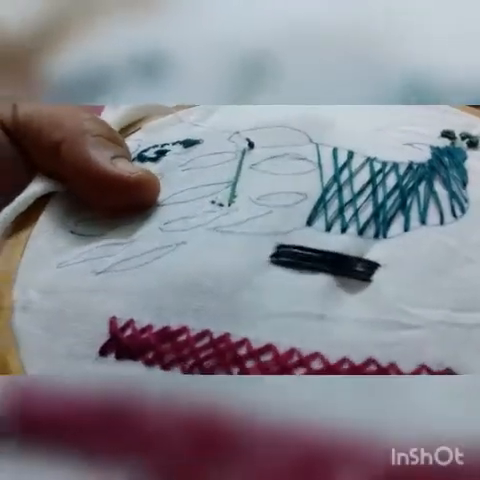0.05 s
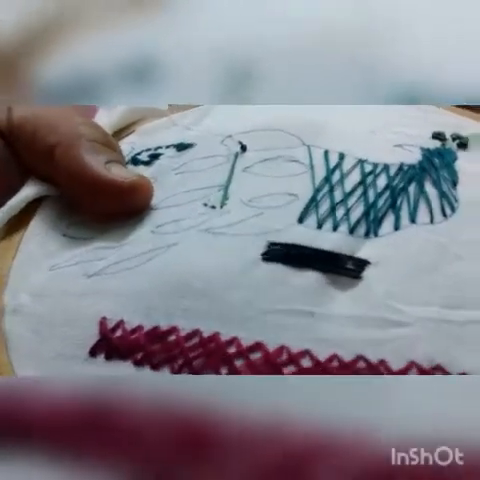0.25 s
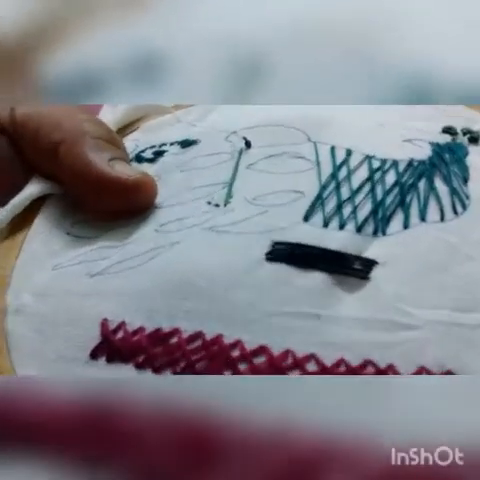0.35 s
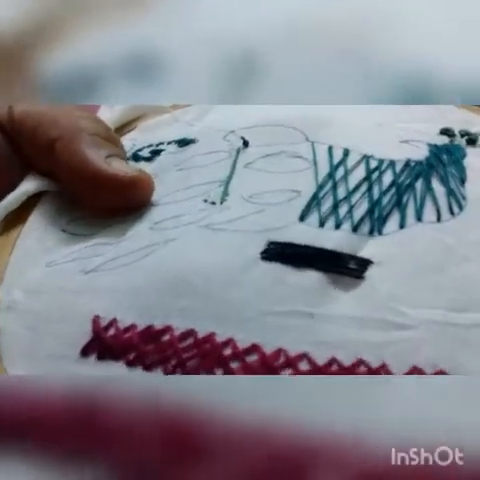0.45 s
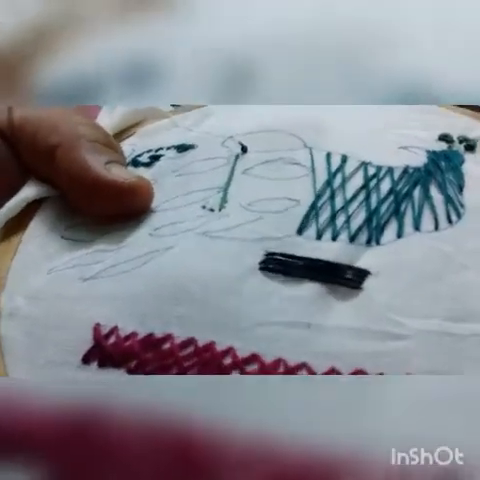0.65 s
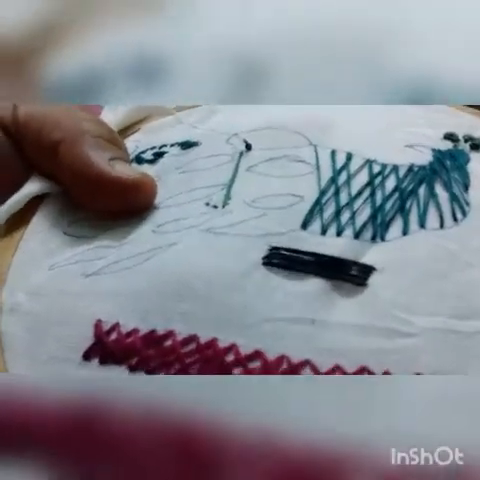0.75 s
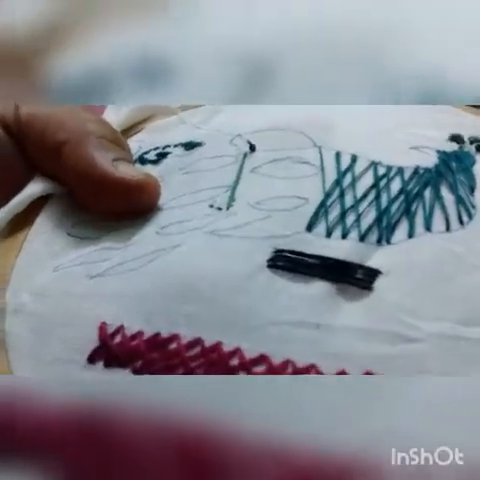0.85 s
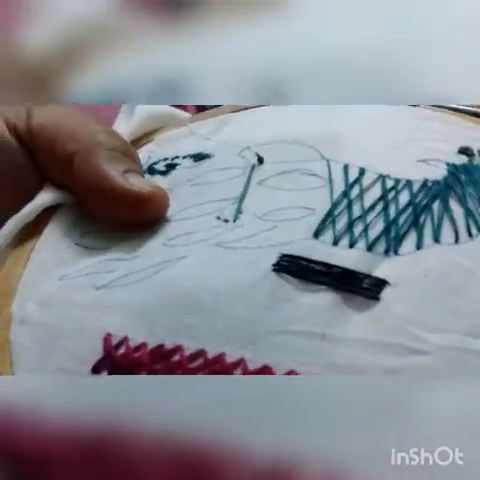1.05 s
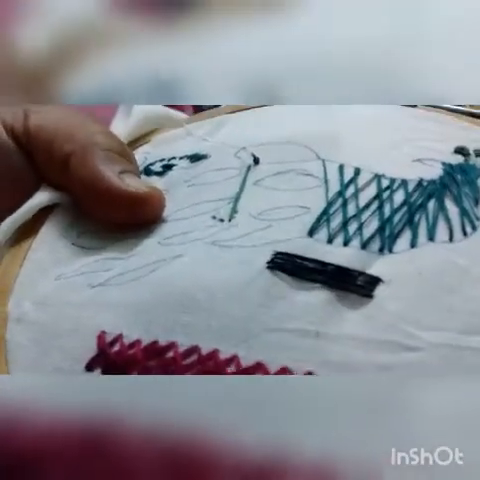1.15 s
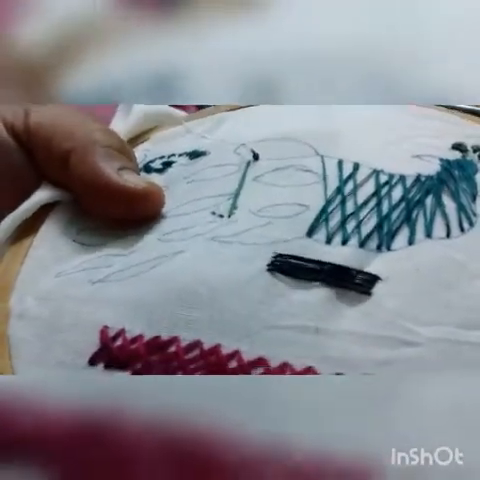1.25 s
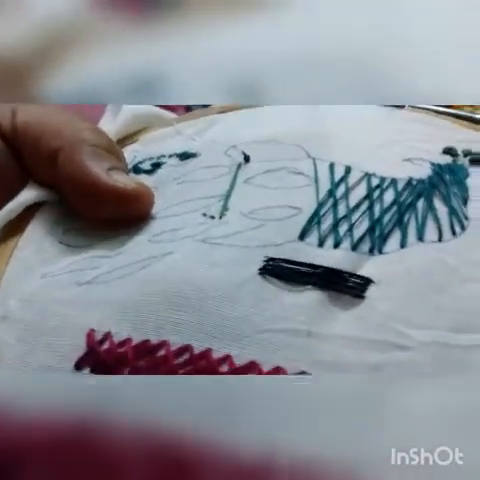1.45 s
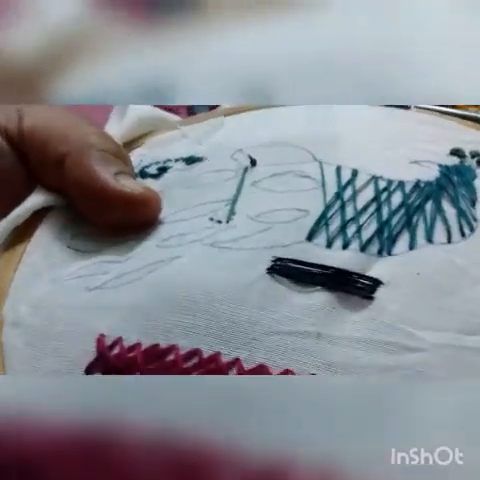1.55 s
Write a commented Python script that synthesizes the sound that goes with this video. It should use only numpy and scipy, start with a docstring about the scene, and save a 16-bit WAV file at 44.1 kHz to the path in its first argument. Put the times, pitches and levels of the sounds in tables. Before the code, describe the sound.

In a quiet room, a sharp, clicking knock hits close on the right. On the left, an embroidery hoop's taut cloth is tapped, then thread scratches and ticks through it, with faint hiss and appliance hum behind.

```python
"""A quiet room, an embroidery hoop held close to a phone's two microphone ports. Soft taps drum on the
stretched cloth by the left port, and thread scratches and ticks through the weave. One sharp knock,
just after a lighter contact, lands right at the right port. Behind are room rumble, hiss and the hum
and whine of an appliance. The phone widens its ports by cross-feed and clips on the knock; its gain
control then ducks the room and slowly lets it back."""
import sys
import numpy as np
from scipy import signal
from scipy.fft import rfft, irfft
from scipy.io import wavfile
from scipy.ndimage import uniform_filter1d

SR = 44100
rng = np.random.default_rng(int(sys.argv[2]) if len(sys.argv) > 2 else 0)


def dump(signal):
    """Clip the signal to [-1, 1] and save it as 16-bit WAV at the path in sys.argv[1]."""
    limited = np.clip(np.atleast_2d(signal).T, -1, 1)
    pcm = np.round(limited * 32767).astype(np.int16)
    wavfile.write(sys.argv[1], SR, pcm)


N = 70560

# Room noise common to both ports, and the part opposed between them. Each row: frequency in Hz, gain in dB.
ROOM_SHARED = [(25, -98.5), (60, -65.5), (110, -65), (180, -65.5), (290, -72), (420, -71), (620, -82.5),
               (950, -80.5), (1300, -89), (1900, -90.5), (2700, -95.5), (4500, -101), (6800, -101),
               (8000, -99), (9500, -101), (15000, -107)]
ROOM_APART = [(25, -85.5), (60, -94.5), (130, -74), (300, -84), (440, -83.5), (650, -89), (950, -88),
              (1300, -85.5), (2400, -89.5), (3200, -92), (4200, -99), (6500, -104), (8000, -93),
              (9500, -104), (15000, -107)]
# Lean of the room noise. Each row: frequency in Hz, left over right in dB.
ROOM_LEAN = [(60, 17), (200, 9.5), (400, 4.5), (1300, 2), (4400, 6), (8000, -3.5), (15000, 6.5)]
# Slow swell of the rumble. Each row: time in seconds, gain in dB.
RUMBLE_SWELL = [(0, 2.5), (.19, 5), (.235, -6), (.45, 0.5), (.65, 2.5), (.9, 3.5), (1.1, 0.5), (1.3, 2),
                (1.6, 8)]

# Mains hum of the appliance. Each row: frequency in Hz, level in dB before the swell.
MAINS_HUM = [(101, -54), (150, -53), (199.5, -56.5)]
# Its airy drone. Each row: frequency in Hz, width in Hz, level in dB, left over right in dB.
DRONE_BANDS = [(450, 14, -64, -8.5), (983, 32, -68, 3)]
# Its thin whine. Each row: frequency in Hz, width in Hz, level in dB before the swell.
WHINE_BANDS = [(1798, 20, -61), (2188, 43, -61)]
# Swell of the hum and whine. Each row: time in seconds, gain in dB.
APPLIANCE_SWELL = [(0, -1), (.18, -4.5), (.24, -5.5), (.5, -1.5), (1.0, -3), (1.5, 4), (1.6, 2)]

# Soft taps on the cloth. Each row: start in seconds, level in dB, boom gain in dB, snap gain in dB.
TAPS = [(.03, -31, 0.5, -35), (0.144, -26, -10, -19), (.595, -34, -16, 5.5), (0.7172, -10, -10, -4.5)]
# A tap's drum note and bright snap. Each row: frequency in Hz, relative level in dB, t60 in seconds.
DRUM_MODES = [(200, 1, .019), (680, -7, .007)]
SNAP_MODES = [(4240, -18, 0.0071), (5630, -21.5, 0.0057), (7500, -12.5, 0.0022), (9900, -2, 0.0013)]

# Scratches on the cloth. Each row: start in seconds, length in seconds, level in dB.
SCRATCHES = [(0.06, 0.3, -51.5), (0.895, 0.072, -46), (1.322, 0.067, -57)]
# Colour of a scratch. Each row: frequency in Hz, relative level in dB.
CLOTH_COLOUR = [(150, -0.5), (600, 8.5), (1200, 12.5), (2400, 6.5), (4500, 1.5), (9000, -40.5),
                (15000, -29.5)]

# Light contact, then hard knock. Each row: start in seconds, level in dB, thump gain in dB, cutoff in Hz.
KNOCKS = [(0.1946, -19.5, -11.5, 2470), (.21, 2, 0.5, 9500)]
# Bright ring of the held body. Each row: frequency in Hz, relative level in dB, t60 in seconds.
BODY_MODES = [(3110, -1, .0021), (4790, -2.5, 0.00099), (9750, -10, 0.0006)]
# Colour of a knock's echo. Each row: frequency in Hz, relative level in dB.
ECHO_COLOUR = [(100, -16), (300, -9), (700, 2.5), (2000, 2.5), (4500, 3), (9000, -10), (11500, -13.5),
               (15000, -36)]

# Thread catching in the weave. Each row: start in seconds, level in dB.
CATCHES = [(.9135, -33), (0.928, -30.5), (.9487, -32.5), (.954, -38), (0.9668, -26.5), (0.9713, -34)]
# Ring of a catch. Each row: frequency in Hz, relative level in dB, t60 in seconds.
CATCH_MODES = [(1670, 7.5, 0.0024), (4900, -21, 0.00081)]

# Cross-feed between the ports. Each row: frequency in Hz, gain in dB.
CROSS_FEED = [(100, -2), (1000, 0.78), (6400, -3.5), (8500, -1.5), (15000, -41)]
# The phone's own hiss. Each row: frequency in Hz, density in dB per Hz.
PHONE_HISS = [(2000, -124), (8000, -121), (11000, -118), (15000, -119)]

TIME = np.arange(N) / SR
FREQS = np.fft.rfftfreq(N, 1 / SR)
LEFT_PORT, OPPOSED = np.array([[1], [0]]), np.array([[1], [-1]])


def undb(db):
    """Decibels to gain."""
    return 10 ** (np.asarray(db) / 20)


def unit(x):
    """Scale to rms 1."""
    return x / np.sqrt(np.mean(x ** 2) + 1e-18)


def colour(x, points):
    """Filter by (Hz, dB) points joined on a log-frequency axis."""
    hz, db = np.array(points, float).T
    gain_db = np.interp(np.log(np.maximum(FREQS, 1)), np.log(hz), db)
    return irfft(rfft(x) * undb(gain_db), N)


def soften(x, hz):
    """Gentle low-pass: a softer contact."""
    return signal.sosfilt(signal.butter(2, hz, fs=SR, output="sos"), x)


def noise_band(hz, width_hz):
    """A wavering tone: noise in one steep resonance, rms 1."""
    resonance = 1 / (1 + ((FREQS - hz) / (width_hz / 2)) ** 2)
    return unit(irfft(rfft(rng.standard_normal(N)) * resonance, N))


def wander(per_s):
    """Smooth random wander, rms 1."""
    hold = int(SR / per_s)
    steps = np.repeat(rng.standard_normal(N // hold + 1), hold)
    return unit(uniform_filter1d(steps, hold)[:N])


def swell(points):
    """Gain over time from (s, dB) points."""
    return undb(np.interp(TIME, *np.array(points).T))


def mode(age, hz, db, t60):
    """One struck vibration, dying by 60 dB in t60 seconds."""
    return undb(db) * np.sin(2 * np.pi * hz * age) * np.exp(-np.log(1000) * age / t60)


def ring(age, modes):
    """Several modes struck together."""
    return sum(mode(age, *row) for row in modes)


def room(waver_db=3):
    """Wavering rumble, smooth hiss and the appliance's airy whistle, heard through the cross-feed."""
    shared, apart = rng.standard_normal((2, N)) * np.sqrt(SR / 2)
    bass = colour(shared, [(200, -4.0), (800, -22)])
    bass_gain = swell(RUMBLE_SWELL) * undb(waver_db * wander(per_s=14.48))
    shared = colour(shared + bass * (bass_gain - 1), ROOM_SHARED)
    whistle = undb(-71) * noise_band(hz=3180, width_hz=82)
    apart = colour(apart, ROOM_APART) + whistle
    left, right = widen(shared + OPPOSED * apart)
    return np.array([colour(left, [(hz, db / 2) for hz, db in ROOM_LEAN]),
                     colour(right, [(hz, -db / 2) for hz, db in ROOM_LEAN])])


def appliance(hum_waver_db=0.5, hum_left_db=1):
    """In the background: mains hum a little to the left, an airy drone and a thin, centred whine."""
    hum = np.zeros(N)
    for hz, db in MAINS_HUM:
        gain = undb(db + hum_waver_db * wander(per_s=3.3))
        hum += gain * unit(np.sin(2 * np.pi * (hz * TIME + rng.random())))
    hum = hum * undb(OPPOSED * hum_left_db / 2)
    drone = sum(undb(db + OPPOSED * left_db / 2) * noise_band(hz, width)
                for hz, width, db, left_db in DRONE_BANDS)
    tone_hz = 2196 + 5.2 * wander(per_s=10)
    tone = undb(-63) * unit(np.sin(2 * np.pi * np.cumsum(tone_hz) / SR))
    whine = tone + sum(undb(db) * noise_band(hz, width) for hz, width, db in WHINE_BANDS)
    return (hum + whine) * swell(APPLIANCE_SWELL) + drone


def taps(fizz_decay_s=0.0026):
    """Close to the left port, the stretched cloth answers like a small slack drum with a bright snap."""
    out = np.zeros(N)
    for start, db, boom_db, snap_db in TAPS:
        age = np.maximum(TIME - start, 0)
        boom = mode(age, hz=57.6, db=boom_db, t60=0.13)
        fizz = undb(-17) * (TIME >= start) * np.exp(-age / fizz_decay_s) * rng.standard_normal(N)
        snap = undb(snap_db) * soften(ring(age, SNAP_MODES) + fizz, hz=8060)
        out += undb(db) * (ring(age, DRUM_MODES) + boom + snap)
    return LEFT_PORT * out


def scratches(slips_per_s=1200, spread_db=2.5):
    """Close to the left port, cloth fibres catch and slip in short strokes."""
    slipping = rng.random(N) < slips_per_s / SR
    slips = slipping * rng.standard_normal(N) * undb(spread_db * rng.standard_normal(N))
    strokes = np.zeros(N)
    for start, length, db in SCRATCHES:
        progress = np.clip((TIME - start) / length, 0, 1)
        strokes += undb(db) * np.sqrt(np.abs(np.sin(np.pi * progress)))
    return LEFT_PORT * unit(colour(slips, CLOTH_COLOUR)) * strokes


def knocks(press_s=0.00066, crack_decay_s=0.0019, echo_t60_s=0.5, grain_db=0.5):
    """Each contact presses the body at the right port; it springs back and rings, with a faint echo."""
    out = np.zeros((2, N))
    for start, db, thump_db, cutoff_hz in KNOCKS:
        press = undb(0.5) * np.sin(np.pi * np.clip((TIME - start) / press_s, 0, 1) ** 2)
        released = TIME >= start + press_s
        age = np.maximum(TIME - start - press_s, 0)
        thump = undb(thump_db) * mode(age, hz=143, db=4.4, t60=0.0066)
        hollow = mode(age, hz=1380, db=-0.5, t60=0.0012)
        body = thump - hollow + ring(age, BODY_MODES)  # the hollow note swings against the thump
        crack = undb(-17.5) * released * np.exp(-age / crack_decay_s) * rng.standard_normal(N)
        out[1] += undb(db) * soften(press - body + crack, cutoff_hz)
        echo = unit(colour(rng.standard_normal((2, N)), ECHO_COLOUR))
        echo *= released * np.exp(-np.log(1000) * age / echo_t60_s)
        out += undb(db - 48.5 + grain_db * wander(per_s=700)) * echo
    return out


def thread():
    """Close to the left port, the thread catches and slips in a run of small dry ticks."""
    ticks = sum(undb(db) * ring(np.maximum(TIME - start, 0), CATCH_MODES) for start, db in CATCHES)
    return LEFT_PORT * ticks


def widen(ports, lag_s=0.000313):
    """Each channel is its own port minus the other, filtered and late by the way between them."""
    delay = np.exp(-2j * np.pi * FREQS * lag_s)
    other_port = irfft(rfft(ports[::-1]) * delay, N)
    return ports - colour(other_port, CROSS_FEED)


def scene():
    """The hoop close to the microphones, the room and the appliance behind."""
    return widen(knocks() + taps() + thread() + scratches()) + room() + appliance()


def gain_control(x, threshold_db=-16, recovery_db_per_s=9.5, late_s=0.048, slew_s=0.028):
    """The phone turns both channels down a moment after a loud peak, then creeps back up."""
    peak_db = 20 * np.log10(np.abs(x).max(axis=0) + 1e-9)
    over_db = np.maximum(peak_db - threshold_db, 0)
    recovery_db = recovery_db_per_s * TIME
    duck_db = np.maximum.accumulate(over_db + recovery_db) - recovery_db
    late_duck_db = np.pad(duck_db, (int(late_s * SR), 0))[:N]
    return x * undb(-uniform_filter1d(late_duck_db, int(slew_s * SR)))


def record(dry, clip_level=0.9, top_hz=15900):
    """In the phone, peaks clip and duck the gain; its faint hiss stays level, and the top is cut."""
    ducked = gain_control(np.clip(dry, -clip_level, clip_level))
    hiss = colour(rng.standard_normal((2, N)) * np.sqrt(SR / 2), PHONE_HISS)
    top_cut = signal.ellip(10, 0.1, 80, top_hz, fs=SR, output="sos")
    return signal.sosfilt(top_cut, ducked + hiss)


dry = scene()
out = record(dry)
dump(out)
```